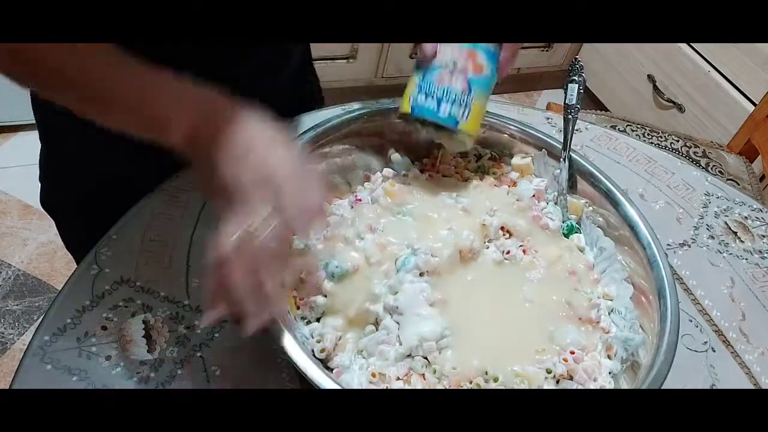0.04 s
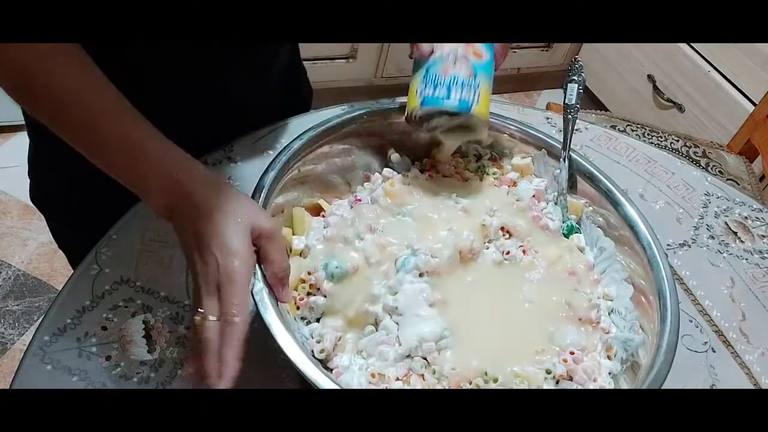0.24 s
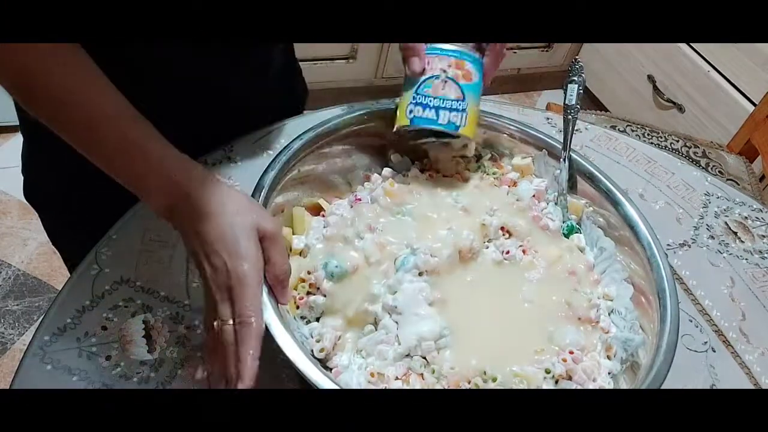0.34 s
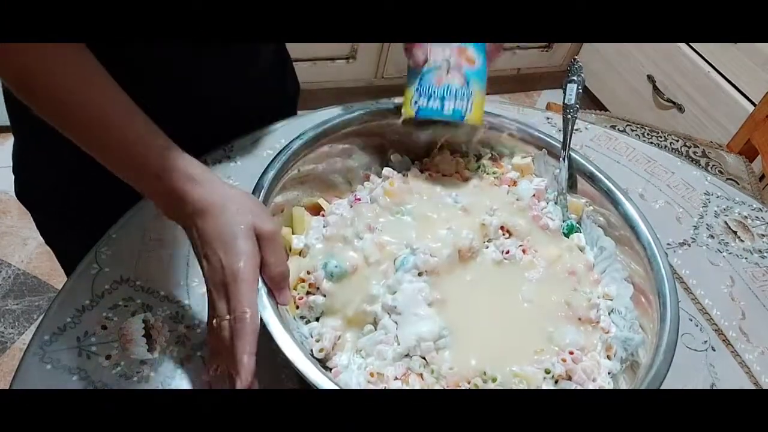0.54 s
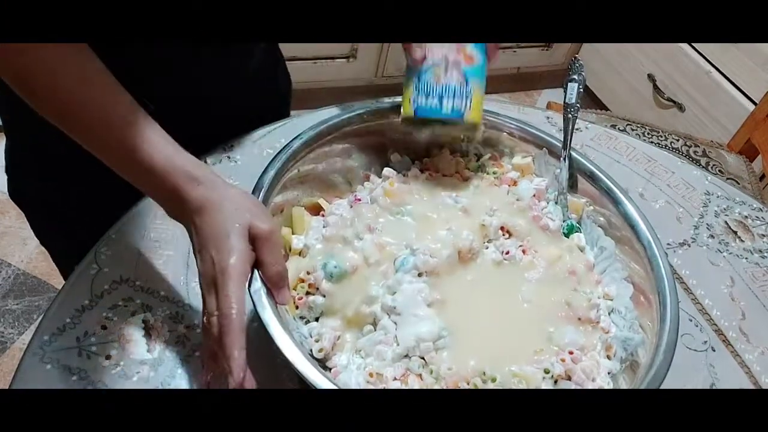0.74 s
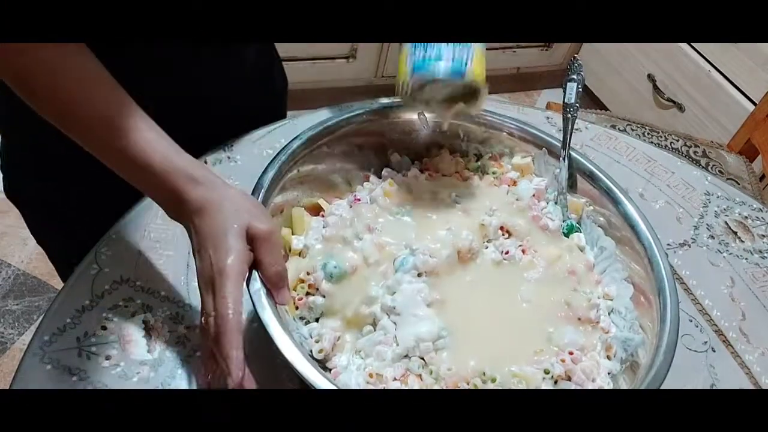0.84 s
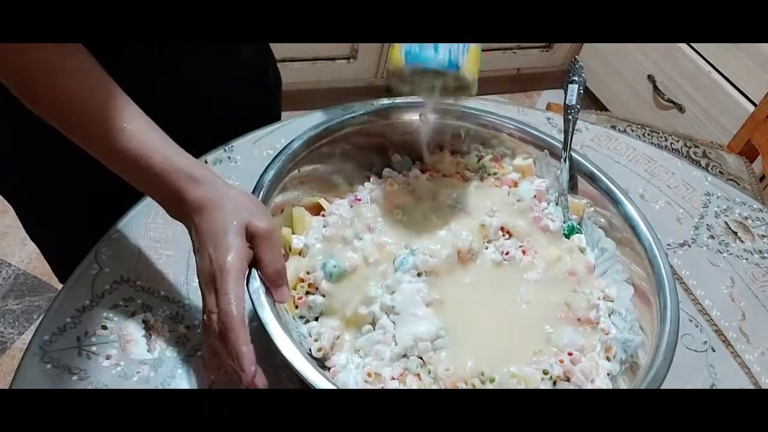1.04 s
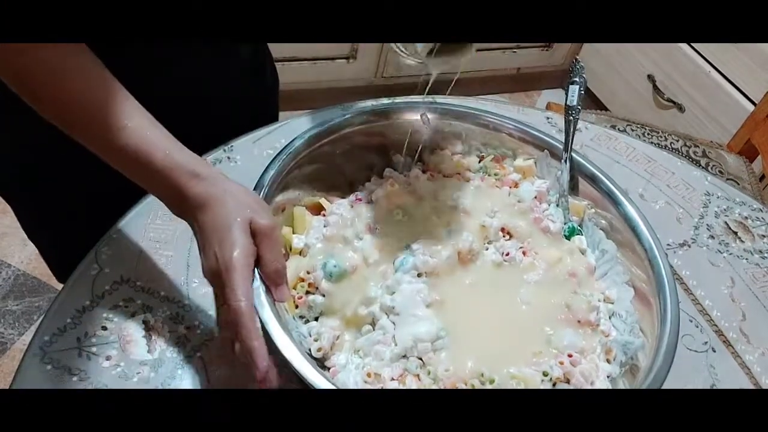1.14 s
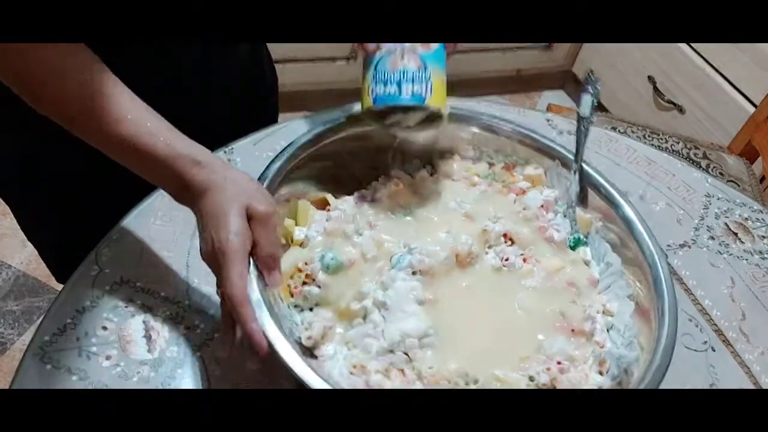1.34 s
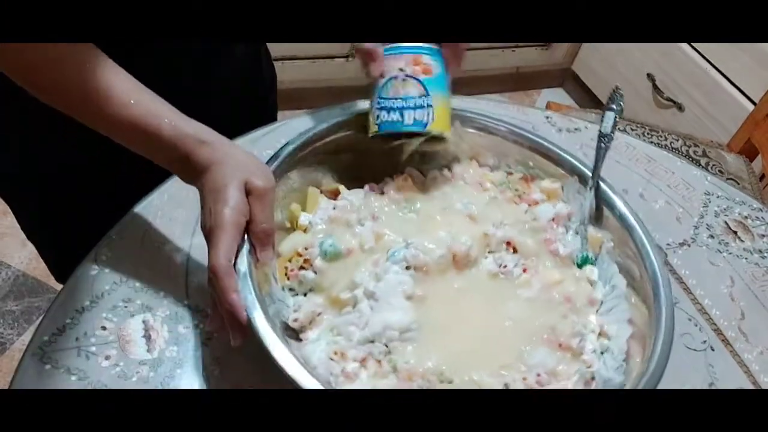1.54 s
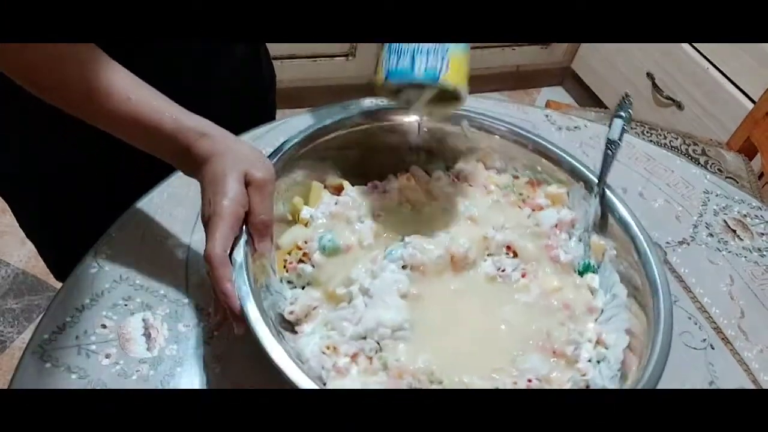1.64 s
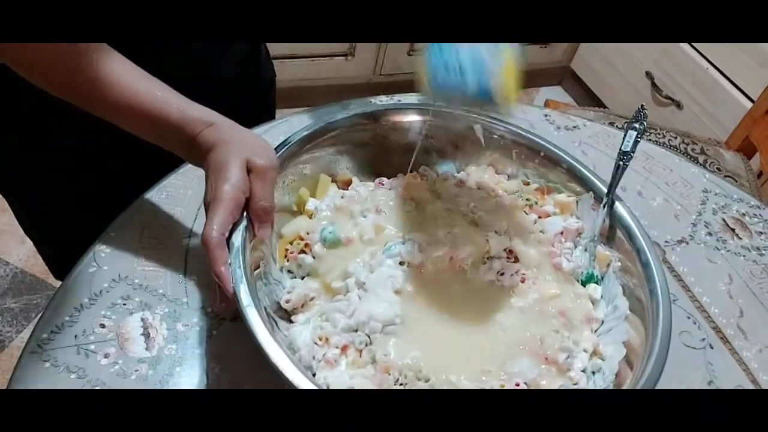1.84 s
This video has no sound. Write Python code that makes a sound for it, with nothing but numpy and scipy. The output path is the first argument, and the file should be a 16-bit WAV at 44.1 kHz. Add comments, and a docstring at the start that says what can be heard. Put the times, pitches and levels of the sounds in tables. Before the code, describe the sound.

An empty tin can knocked seven times on the rim of a full steel mixing bowl

```python
"""A faint kitchen hush comes first, then an emptied tin can is knocked seven times on the rim of a full
steel mixing bowl, held still on a kitchen table. Each knock is a sharp crack (a pressure swing and shaped
noise), a short hollow ring of can and rim (fading sine waves), a grainy rattle and a thud through the table.
A light touch comes just before the last two knocks, which have the can tipped to another angle.
The small hard-walled kitchen rings on after each: noise-like reflections and slow standing waves."""
import sys
import numpy as np
from scipy import signal
from scipy.fft import rfft, irfft
from scipy.io import wavfile
from scipy.ndimage import uniform_filter1d

SR = 44100
rng = np.random.default_rng(int(sys.argv[2]) if len(sys.argv) > 2 else 0)


def transcribe(signal):
    """Save signal, clipped to [-1, 1], as a 16-bit WAV file at the path in sys.argv[1]."""
    frames = np.atleast_2d(signal).T
    limited = np.clip(frames, -1, 1)
    pcm = np.round(limited * 32767).astype(np.int16)
    wavfile.write(sys.argv[1], SR, pcm)


N = 83790  # length of the scene in samples
BASS_ALIKE = 0.92  # likeness of left and right in the bass, 0-1
CONTACT_SHARED_HZ, ROOM_SHARED_HZ = 2310, 830  # above these pitches left and right differ
RIGHT_LAG_S = 0.00005  # the contact and the ringing modes reach the right side this much later
DETUNE = 0.0011  # random pitch scatter of every mode, as a fraction of its pitch


def undb(db):
    """Turn decibels into a plain gain."""
    return 10 ** (np.asarray(db) / 20)


def curve(points, hz, axis=1):
    """Read one column of a table on a log-frequency axis."""
    p = np.array(points, float)
    return np.interp(np.log(hz + 1e-9), np.log(p[:, 0]), p[:, axis])


def noise(size, shared_hz):
    """Stereo white noise, alike left and right in the bass and unrelated in the treble."""
    hz = np.fft.rfftfreq(size, 1 / SR)
    alike = np.clip(BASS_ALIKE, 0, 1) / (1 + (hz / shared_hz) ** 2)
    mid, side = rfft(rng.standard_normal((2, size)))
    mid = mid * np.sqrt((1 + alike) / 2)
    side = side * np.sqrt((1 - alike) / 2)
    return irfft(np.array([mid + side, mid - side]), size)


def colour(x, points, tilt_db=0, size=2048):
    """Filter with the given spectrum, tilted in dB per octave above 2 kHz, that never sounds early."""
    hz = np.fft.rfftfreq(size, 1 / SR)
    db = curve(points, hz) + tilt_db * np.log2(np.maximum(hz, 2000) / 2000)
    # folding the cepstrum forward in time gives a filter that starts at once (minimum phase)
    cepstrum = irfft(np.log(undb(db)))
    cepstrum[1:size // 2] *= 2
    cepstrum[size // 2 + 1:] = 0
    response = irfft(np.exp(rfft(cepstrum)))
    return signal.fftconvolve(x, response[None], axes=1)[:, :x.shape[1]]


def even(x, width_hz):
    """Level out the humps of a burst's spectrum that are wider than width_hz, to about gain 1."""
    size = 2 * x.shape[1]
    spectrum = rfft(x, size)
    power = np.mean(np.abs(spectrum) ** 2, axis=0)
    smooth_power = uniform_filter1d(power, int(width_hz * size / SR))
    return irfft(spectrum / np.sqrt(np.abs(smooth_power) + 1e-12), size)[:, :x.shape[1]]


def fade(t, t60):
    """Exponential decay that has dropped 60 dB after t60 seconds."""
    return np.exp(-np.log(1000) * t / t60)


def ring(t, modes, push_s):
    """Fading sine waves of alternating sign that swell over push_s and reach the right side later."""
    t = np.maximum(t - np.array([[0], [RIGHT_LAG_S]]), 0)
    scatter = 1 + DETUNE * rng.standard_normal(len(modes))
    waves = 0
    for k, (hz, t60, db) in enumerate(modes):
        wave = np.sin(2 * np.pi * hz * scatter[k] * t)
        waves = waves + (-1) ** k * undb(db) * fade(t, t60) * wave
    return waves * (1 - np.exp(-t / push_s))


def add(track, start, sound):
    """Mix a sound into the track at its time."""
    i = int(start * SR)
    track[:, i:i + sound.shape[1]] += sound[:, :N - i]


# colour of the kitchen's hush: (pitch [Hz], relative level [dB])
HUSH_COLOUR = [(20, -30), (50, -33), (125, -6), (200, -16.5), (350, -5.5), (480, -19), (700, -11),
               (1200, -18), (2800, -26.5), (8000, -38.5), (16000, -30.5)]
# loudness of the hush over time: (time [s], level [dB])
HUSH_LOUDNESS = [(0, -45.5), (.18, -51.5), (1.2, -53), (1.9, -52.5)]


def hush():
    """Low room noise, made from coloured white noise, that sinks at the start and then stays nearly level."""
    gain = undb(curve(HUSH_COLOUR, np.fft.rfftfreq(N, 1 / SR)))
    x = irfft(rfft(noise(N, ROOM_SHARED_HZ)) * gain, N)
    level_db = np.interp(np.arange(N) / SR, *np.array(HUSH_LOUDNESS).T)
    return x / x.std() * undb(level_db)


# kitchen reverberation: (pitch [Hz], level against the direct sound [dB], time to fade by 60 dB [s])
REFLECTIONS = [(59, -6, 0.84), (180, -1, 0.47), (432, 2.5, 0.55), (756, -11.5, 0.39), (1400, -5, 0.46),
               (2310, -6, 0.49), (4560, -4, 0.41), (7900, -4.5, .38), (15200, -3.5, 0.29)]
ROOM_DELAY_S, ROOM_BUILD_S = 0.0031, 0.002  # wait before the reflections, and how fast they build up


def kitchen(dry):
    """Dense reflections that build up quickly and die away band by band, each at its own speed."""
    t = np.arange(SR * 3 // 4) / SR
    hz = np.fft.rfftfreq(len(t), 1 / SR)
    wash = rfft(noise(len(t), ROOM_SHARED_HZ))
    centres = np.log([row[0] for row in REFLECTIONS])
    build = 1 - np.exp(-np.maximum(t - ROOM_DELAY_S, 0) / ROOM_BUILD_S)
    tail = 0
    for (_, _, t60), band in zip(REFLECTIONS, np.eye(len(REFLECTIONS))):
        band_gain = np.interp(np.log(hz + 1), centres, band)  # overlapping triangles
        tail = tail + irfft(wash * band_gain, len(t)) * fade(t, t60)
    # evening smears a little sound into the silent wait, so the build-up is applied again
    echoes = even(build * tail, 60) * build
    response = colour(echoes, REFLECTIONS)
    return signal.fftconvolve(dry, response, axes=1)[:, :N]


# standing waves of the kitchen: (pitch [Hz], time to fade by 60 dB [s], relative level [dB])
ROOM_MODES = [(81.6, 0.67, -37.5), (139, 0.56, -47.5), (176.2, 0.81, -35.5), (212.6, 0.42, -37),
              (396, 0.29, -42), (626, 0.43, -22.5), (724.6, 0.33, -21)]


def standing_waves():
    """Waves between the walls that swell slowly after a knock and then die away."""
    t = np.arange(SR * 3 // 5) / SR
    return ring(t, ROOM_MODES, 0.028)  # swell in seconds


# modes of the loaded bowl on the table: (pitch [Hz], time to fade by 60 dB [s], relative level [dB])
TABLE_MODES = [(55, 0.29, -38), (151.2, 0.053, -26), (236, 0.044, -19), (280.4, 0.038, -23.5),
               (400.6, 0.046, -31)]


def table_thud(t):
    """The loaded bowl shakes the table, heard as a few low fading tones."""
    return ring(t, TABLE_MODES, 0.0005)  # swell in seconds


# colour of the thin wall's rattle: (pitch [Hz], relative level [dB])
RATTLE_COLOUR = [(200, 7), (700, 8.5), (1500, 2), (2400, -4), (3500, -5.5), (4200, -17.5), (4650, -1),
                 (5300, -12), (8000, -16), (11000, -14), (15000, -13.5)]
RATTLE_DB, RATTLE_T60_S = -18, 0.11  # relative level; time to fade by 60 dB
GRAIN_DB, GRAIN_S = -6.5, 0.00156  # spread of the uneven bursts, and time between random levels


def grain(size):
    """Random gain that glides from one tiny contact's level to the next; mean power 1."""
    db = GRAIN_DB * rng.standard_normal(size)
    gain = undb(np.interp(np.arange(size) / SR / GRAIN_S, np.arange(size), db))
    return gain / np.sqrt(np.mean(gain ** 2))


def wall_rattle(t, bright_db):
    """The thin wall buzzes in small uneven bursts, made of coloured fading noise."""
    bursts = noise(len(t), CONTACT_SHARED_HZ) * grain(len(t)) * fade(t, RATTLE_T60_S)
    return undb(RATTLE_DB) * colour(bursts, RATTLE_COLOUR, bright_db)


# modes of can and rim: (pitch [Hz], time to fade by 60 dB [s],
#                        relative level with can upright [dB], relative level with can tipped [dB])
METAL_MODES = [(605, 0.026, -9.5, -11), (654.6, 0.061, -4.5, -12), (823, 0.031, -1, -21),
               (940, 0.059, -14, -13), (1130, 0.02, -68, -14), (1198, 0.048, -33, -15),
               (1304.7, 0.053, -16.5, -26), (1340, 0.074, -29, -26), (1675, 0.028, -39, -27),
               (1607, 0.045, -12.5, -48), (2004, 0.033, -21, -44.5), (2308, 0.025, -23, -43.5),
               (2260, 0.0065, -42, -32.5), (2470, 0.014, -34, -21), (3200, 0.066, -48, -47),
               (4580, 0.029, -18, -52), (4790, 0.018, -21, -16)]


def metal_ring(t, tipped):
    """Can and rim ring hollow; the can's angle sets how loud each mode is."""
    modes = [(hz, t60, up + tipped * (tip - up)) for hz, t60, up, tip in METAL_MODES]
    return ring(t, modes, 0.00022)  # swell in seconds


# colour of the contact crack: (pitch [Hz], relative level [dB])
CRACK_COLOUR = [(200, -21), (700, -43), (1300, -11.5), (2300, 1.5), (3500, -10), (4200, -0.5), (4650, 3),
                (5300, -8.5), (8000, -10.5), (11000, -8.5), (15000, -18)]
CRACK_DB, CRACK_T60_S = -2.5, 0.02  # relative level; time for the noise to fade by 60 dB
SNAP_DB, SNAP_S, SNAP_AT_S = -2.5, 0.00017, 0.0004  # relative level, half width and moment of the swing


def contact_crack(t, bright_db):
    """The sudden stop swings the air pressure up and down once, along with a short burst of noise."""
    u = (t - SNAP_AT_S - np.array([[0], [RIGHT_LAG_S]])) / SNAP_S
    snap = -undb(SNAP_DB) * u * np.exp((1 - u ** 2) / 2)
    envelope = fade(t, CRACK_T60_S)
    burst = even(noise(len(t), CONTACT_SHARED_HZ) * envelope, 500)
    # evening sets the burst to unit gain, so the strength of its envelope is put back
    crack = undb(CRACK_DB) * colour(burst, CRACK_COLOUR, bright_db) * np.linalg.norm(envelope)
    return snap + crack


def knock(ring_db, crack_db, thud_db, rattle_db, bright_db, tipped):
    """One blow: crack at the contact, ring and rattle of the metal, thud of the table."""
    t = np.arange(SR // 5) / SR
    metal = undb(ring_db) * metal_ring(t, np.clip(tipped, 0, 1))
    thud = undb(thud_db) * table_thud(t)
    crack = undb(crack_db) * contact_crack(t, bright_db)
    rattle = undb(rattle_db) * wall_rattle(t, bright_db)
    return metal + thud + crack + rattle


# knocks of the can on the rim: (time [s], level [dB], ring [dB], crack [dB], thud [dB], rattle [dB],
#                                contact brightness [dB per octave], can tipped [0-1])
KNOCK_TIMES = [(.1993, -8, 1.5, -3.5, 7, 2, -2, 0.63), (0.3798, -5, 3, 0, 7.5, 5.5, 1, 0.38),
               (0.5439, -4, 7.5, 1, 8.5, 0.5, 0.5, 0.52), (0.7256, -3, 4, 0, 5.5, 2.5, 0.5, 0.34),
               (0.9479, -3, 4, 2.5, 7.5, 6, -0.4, 0.56), (1.2928, 1, 0, -1.5, 3.5, 6.5, 0.57, 1),
               (1.5641, -2, 4, -5, 0, 5.5, 2.15, 0.96)]
# light touch of the can on the rim, same columns: (time [s], level [dB], ring [dB], crack [dB],
#                 thud [dB], rattle [dB], contact brightness [dB per octave], can tipped [0-1])
LIGHT_TOUCH = [(1.2302, -23.5, -3, -5, -35, 6, 6.5, .5)]


def scene():
    """The knocks and the touch, the standing waves that each one wakes, reflections and hush."""
    dry, boom = np.zeros((2, 2, N))
    for start, db, *blow in KNOCK_TIMES + LIGHT_TOUCH:
        add(dry, start, undb(db) * knock(*blow))
        add(boom, start, undb(db) * standing_waves())
    return dry + kitchen(dry) + boom + hush()


LOW_CUT_HZ, TOP_HZ = 38, 15500  # lowest and highest pitch that pass
CEILING = 1.15  # loud peaks are rounded towards this sample value


def record(dry):
    """The phone drops the deepest bass, rounds the loudest peaks and cuts the top."""
    low_cut = signal.butter(3, LOW_CUT_HZ, "high", fs=SR, output="sos")
    top_cut = signal.ellip(8, .2, 80, TOP_HZ, fs=SR, output="sos")
    x = signal.sosfilt(low_cut, dry)
    rounded = CEILING * np.tanh(x / CEILING)
    return signal.sosfilt(top_cut, rounded)


dry = scene()
out = record(dry)
transcribe(out)
```